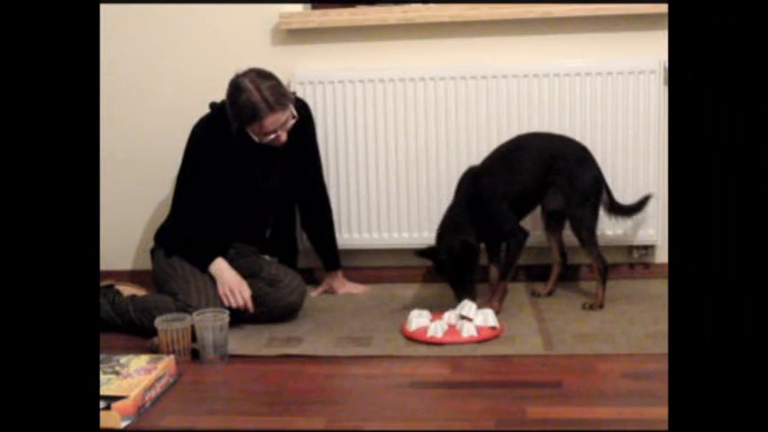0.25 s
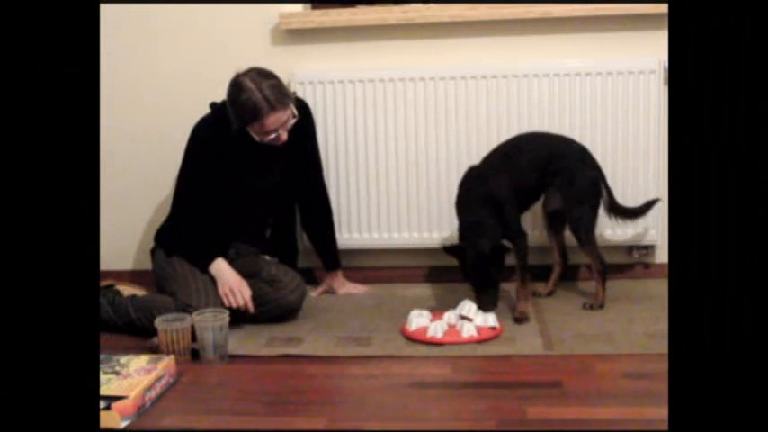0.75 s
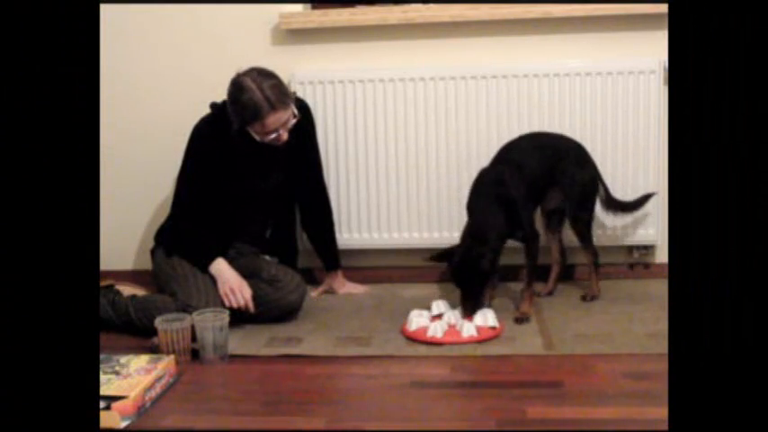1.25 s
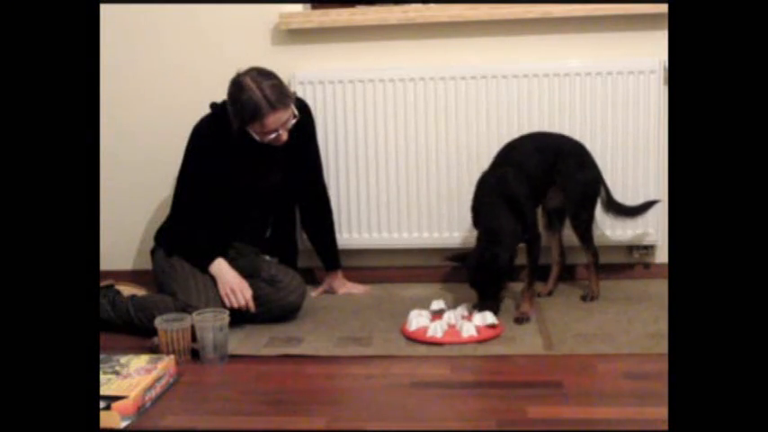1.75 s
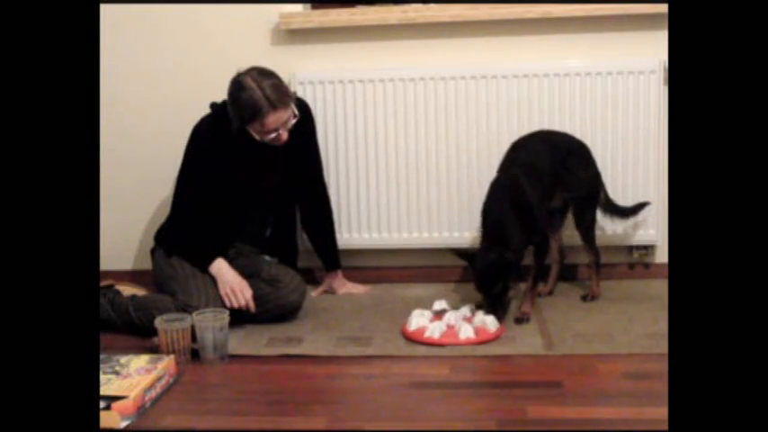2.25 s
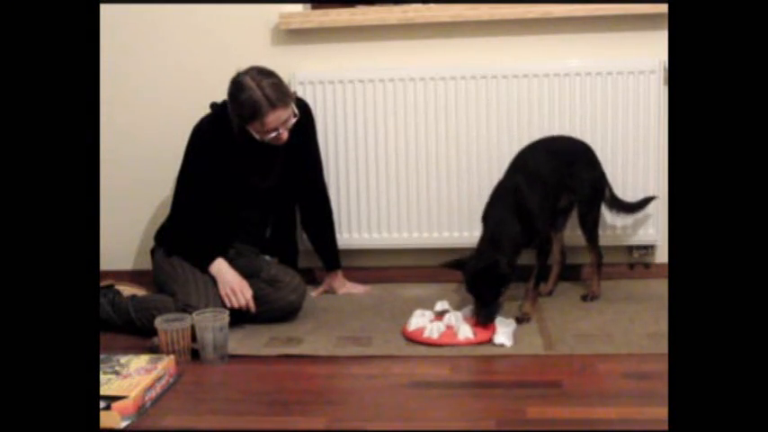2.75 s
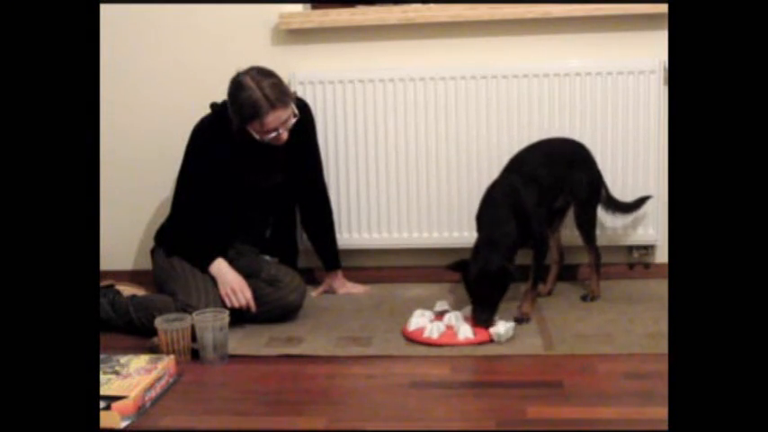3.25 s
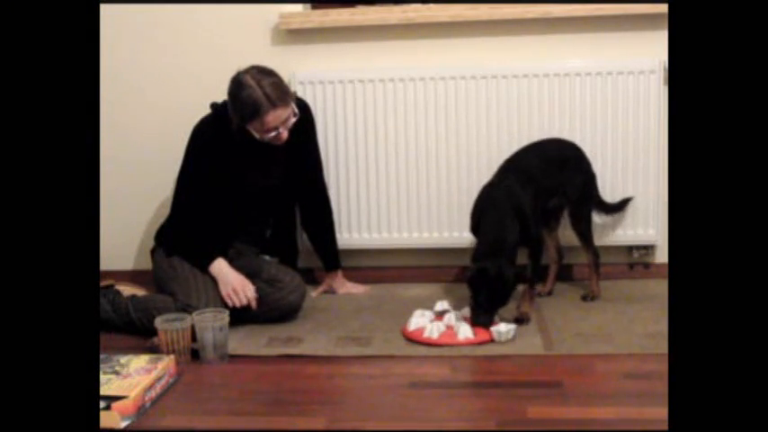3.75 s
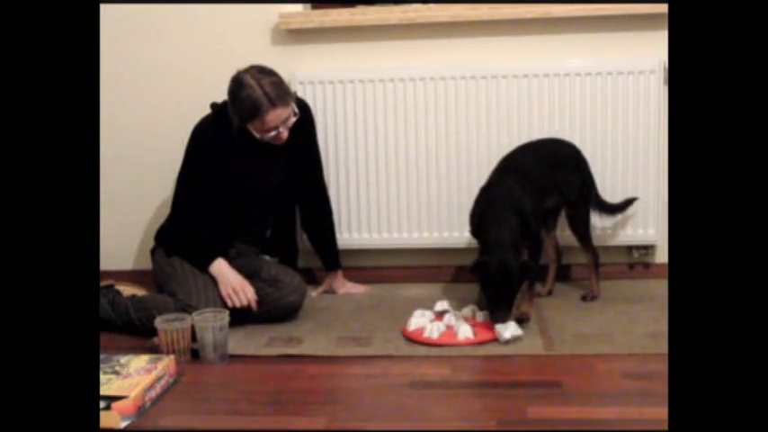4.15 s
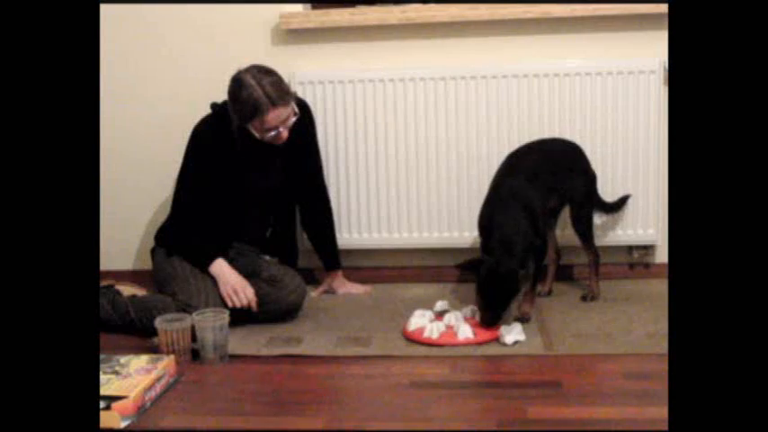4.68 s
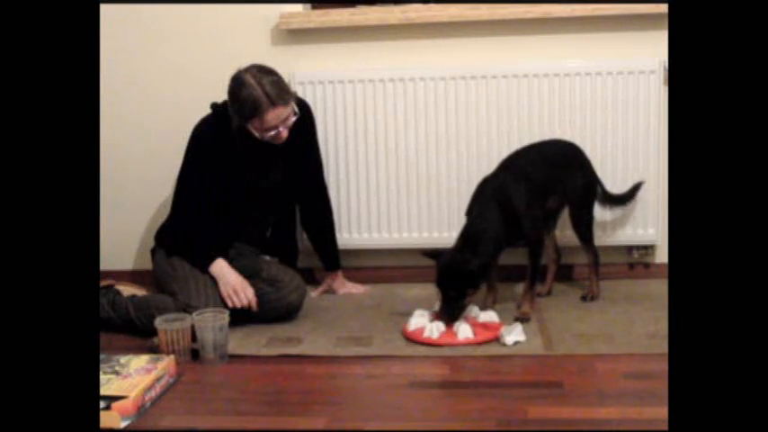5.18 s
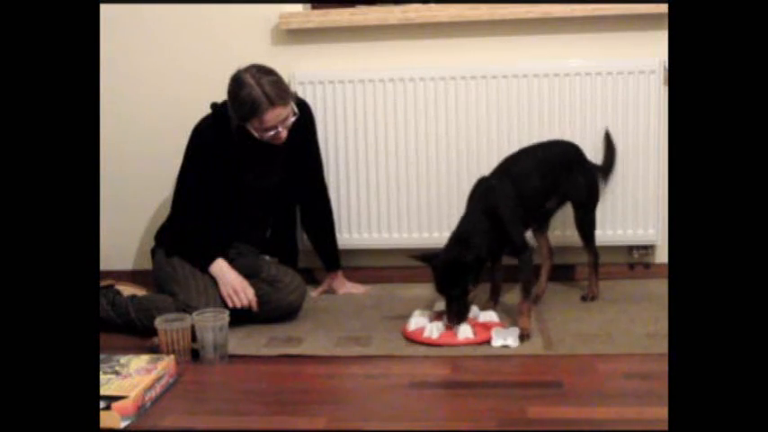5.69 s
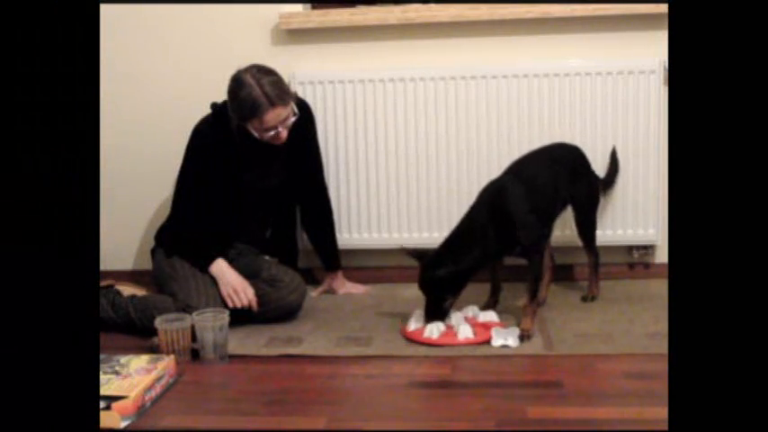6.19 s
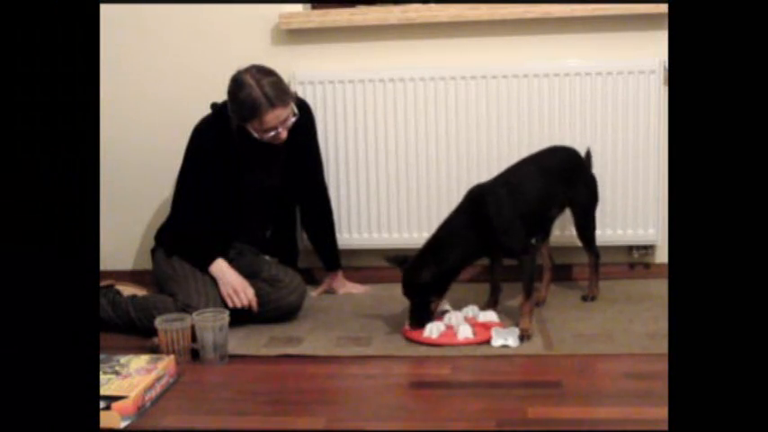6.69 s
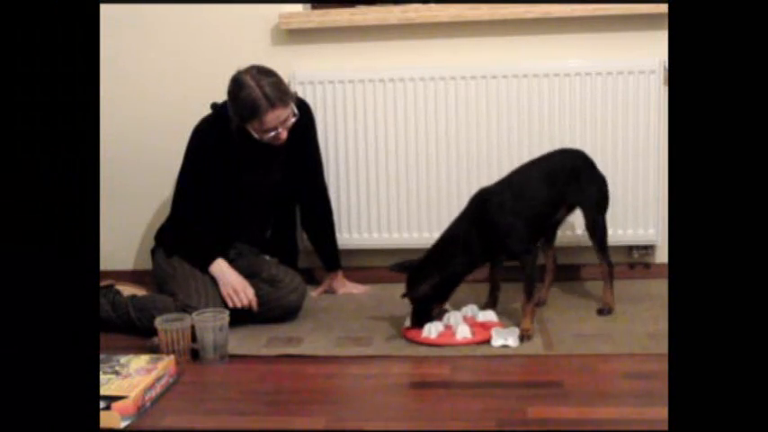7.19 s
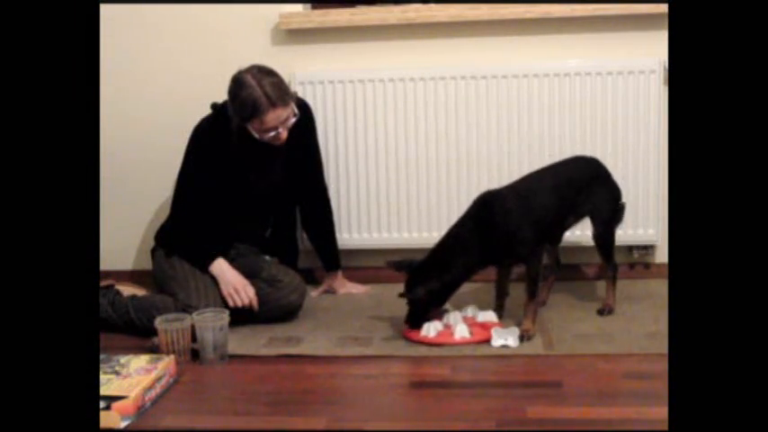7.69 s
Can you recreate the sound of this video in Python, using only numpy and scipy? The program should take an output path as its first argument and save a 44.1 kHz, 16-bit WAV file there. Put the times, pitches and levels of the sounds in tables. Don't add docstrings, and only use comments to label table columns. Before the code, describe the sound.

Short, dry plastic knocks and scraping rattles come in uneven bursts during the first three seconds, with rapid soft nose puffs between them. Afterwards mostly sniffing and faint lid taps remain, plus a small nasal snort, subdued paw thuds and one bright clack. Near the end come several firmer knocks and a longer breathy snort. Distant indoor pickup, short lively echo, constant low hiss.

```python
import sys
import numpy as np
from scipy import signal
from scipy.fft import rfft, irfft
from scipy.io import wavfile

SR = 44100
rng = np.random.default_rng(int(sys.argv[2]) if len(sys.argv) > 2 else 0)


def linear_from_db(decibels):
    return 10 ** (np.asarray(decibels, float) / 20)


def store_wav(level_fs):
    pcm = np.round(np.clip(np.atleast_2d(level_fs), -1, 1) * 32767)
    wavfile.write(sys.argv[1], SR, pcm.T.astype(np.int16))


N = 349706
T = np.arange(N) / SR

# f/Hz, level/dB per Hz
HISS_COLOUR = [(12, -36.5), (20, 2.5), (270, -1.5), (377, -3.5), (624, -5.5), (1260, -10.5), (1400, -8),
               (2600, -14.5), (3530, -14), (3950, -15.5), (16000, -27.5)]
# f/Hz, t60/s
ROOM_T60 = [(350, 0.38), (800, 0.4), (2000, 0.4), (5000, 0.38), (12000, 0.2)]
# delay t/s, level/dB
WALL_ECHOES = [(.0055, -12), (.0125, -14.5), (.0145, -23.5), (.022, -19), (.033, -17)]
# f/Hz, width f/Hz
PORT_NOTCH = (7880, 330)
# t/s, level/dB, f/Hz
PAW_THUDS = [
    (0.048, -48, 101),
    (0.057, -48.5, 183),
    (1.28, -51, 75.5),
    (3.092, -52, 91),
    (3.101, -49.5, 193),
    (3.26, -45, 266),
    (3.271, -37.5, 350),
    (2.739, -33.5, 350),
    (5.679, -48.5, 350),
    (7.659, -48.5, 74),
]
# f/Hz, width f/Hz, level/dB
NOSTRILS = [(2050, 740, 0), (3150, 910, -1.5), (1360, 960, -6), (6050, 2200, 2), (10500, 5000, -29)]
# first t/s, last t/s, first level/dB, last level/dB
SNIFF_RUNS = [(0.508, 0.666, -59, -58), (0.75, 0.76, -61, -62), (1.173, 1.18, -62.5, -60),
              (1.961, 2.102, -55.5, -58.5), (3.16, 3.855, -60, -62), (4.125, 4.13, -66, -64),
              (4.211, 4.281, -59.5, -59.5), (4.71, 4.867, -61.5, -56.5), (5.008, 5.114, -64.5, -60),
              (5.246, 5.25, -53, -50), (5.386, 5.948, -59, -57), (6.236, 6.793, -55, -57.5),
              (6.934, 7.238, -58, -56.5)]
# start t/s, peak t/s, end of blow t/s, hiss level/dB, nasal body over hiss level/dB
SNORTS = [
    (4.38, 4.52, 4.528, -57, 11),
    (7.654, 7.766, 7.91, -41.5, -4.5),
]
# f/Hz, level/dB, t60/s
LID_RING = [(1423, -2.5, 0.023), (1557, -3.5, 0.027), (1759, -2, .012), (2010, -2.5, 0.0079)]
# f/Hz, level/dB, t60/s
TRAY_BOOM = [(350, -17, 0.068), (481.7, -5, 0.081), (547, 1.5, 0.04), (628.7, 1.5, 0.056)]
# f/Hz, level/dB, t60/s
TRAY_WALL = [(782, -3, 0.02), (919, -3.5, 0.027), (1050, -1.5, 0.028), (1171, -2, 0.016)]
# f/Hz, level/dB, t60/s
RIM = [(2400, -15.5, 0.0036), (2870, -9, 0.0021), (3204, -15.5, 0.0039), (4500, -26.5, 0.0025)]
# f/Hz, level/dB, t60/s
TICK = [(6040, -4, 0.0013), (6980, -34.5, 0.0013), (8400, -21.5, 0.0032), (12200, -38, .0015)]
KNOCK_FAMILY_DB = [1, -2.5, 4.5, 13, 17.5]
RATTLE_FAMILY_DB = [-15.5, -18.5, -18.5, -8, -17]
# low f/Hz, high f/Hz, grit t60/s, level/dB
CRACKS = [(2120, 4290, 0.017, 2.0), (5200, 18000, 0.0047, -8)]
# t/s, lid level/dB, boom and wall over lid level/dB, hardness level/dB
SHOVES = [(0.0114, -24.5, -14, -27, 1), (0.0393, -18, -7, -8.5, -1.5), (0.0732, -9.5, -5, -7, 0),
          (0.1194, -26, 0, -26, 5), (0.1376, -13.5, -8.5, -10, 2), (0.2184, -22.5, -4, -0.5, -11),
          (0.3194, -29, -3, -0.5, -1.5), (1.0006, -23.5, -6.5, -1, 0.5), (1.2824, -40.5, 0.5, 3.5, 10),
          (1.3518, -37, -1, 3, 4), (1.3788, -29.5, -12, -9, -12), (1.3962, -12, -14, -15.5, -13),
          (1.4621, -20.5, -7, -24, -14), (1.4835, -16, -7, -6.5, -4.5), (1.5875, -23, 4, -5, -0.5),
          (1.6626, -12.5, -10.5, -9, -11), (1.7165, -22.5, -7, -13, -4), (1.7609, -27, -3.5, -2.5, -6.5),
          (1.8384, -44, 13, 9, 2)]
# t/s, lid level/dB, boom and wall over lid level/dB, hardness level/dB
DROPS = [(2.2153, -34.5, -23, 1, 3), (2.2312, -18, 0, -24, -1.5), (2.2354, -45, -5, -6, 10),
         (2.2411, -15.5, -10, 4.5, 13), (2.383, -19.5, -6, -4, 7.5), (2.5005, -24.5, -6, -6, 1),
         (2.6645, -34, 6, 6, 6.5), (2.7064, -27.5, 1, -3, 4.5), (2.7261, -13, -11, -3.5, 1),
         (2.8141, -26.5, -29, -4, 8.5), (2.9065, -27, -9.5, 0.5, 5.5), (3.2573, -17.5, -10.5, -4, -9.5),
         (3.3684, -40.5, 1, -3, -7), (7.3636, -17, -2, -5.5, -5), (7.6387, -24.5, -5, -3, 0.5),
         (7.781, -29, 1.5, 1, -4), (7.9079, -19, -6, -7, 6.5)]
# t/s, lid level/dB, boom and wall over lid level/dB, hardness level/dB
NUDGES = [(0.5774, -51.5, 7, 4, -1), (0.8724, -36.5, -6.5, -6, 4.5), (2.0264, -54.5, 15, 9, 16),
          (2.0792, -49.5, 3, 2.5, 2), (3.4875, -45, 2.5, 0, -16), (3.6684, -51.5, -2, 1, -11),
          (3.7958, -58.5, 7, -1, -7), (5.4345, -60, 10.5, 5.5, 24.5), (5.6715, -36.5, 0, -2, -5),
          (5.7954, -58.5, -1, 7, 17), (5.8944, -60.5, 17.5, 10, 1), (5.9085, -52, -9, 7.5, 13),
          (6.0744, -45, 1, -5, 7), (6.5924, -49, 1.5, 1, 13), (6.7114, -44, -5, 7, -15),
          (6.7704, -53.5, 4, 7, 1), (6.8134, -41.5, 2, -3, -6), (7.0628, -42, 2, 2.5, 6.5),
          (7.1631, -47, -6, 5, -3), (7.2404, -44.5, 3.5, 6.5, 7.5)]
# start t/s, end t/s, first level/dB, last level/dB
DRAGS = [
    (0.0, 0.064, -19, -24.5),
    (0.072, 0.328, -23.5, -36.5),
    (1.34, 1.665, -28.5, -26.5),
    (1.72, 1.897, -44, -30),
    (2.222, 2.242, -18, -12),
    (2.25, 2.356, -38, -54),
    (2.658, 2.73, -31, -24.5),
    (2.738, 3.0, -32, -35.5),
    (7.802, 7.893, -29, -40),
    (7.9, 7.908, -19, -22),
]
# t/s, peak level/dB
CLAW_CLACK = [
    (6.0002, -17),
]
# f/Hz, level/dB, t60/s
LOOSE_LID = [(1585, -7.5, 0.051), (1784, 1.5, 0.016), (2006, 3.5, 0.015), (2340, -5.5, 0.02),
             (4840, -11, 0.01)]


def rms_one(x):
    return x / np.sqrt(np.mean(x ** 2) + 1e-20)


def at_hz(points, hz):
    table = np.array(points)
    return np.interp(np.log(hz), np.log(table[:, 0]), table[:, 1])


def band_filter(x, low_hz, high_hz):
    return signal.sosfilt(signal.butter(2, [low_hz, high_hz], "band", fs=SR, output="sos"), x)


def spans_gain(spans):
    gain = 0
    for span in spans:
        times, levels_db = np.transpose(span)
        gain = gain + linear_from_db(np.interp(T, times, levels_db, left=-200, right=-200))
    return gain


def ring(clicks, hz, t60):
    shrink = linear_from_db(-60 / (t60 * SR))
    turn = 2 * np.pi * hz / SR
    return signal.lfilter([0, np.sin(turn)], [1, -2 * shrink * np.cos(turn), shrink ** 2], clicks + 1e-18)


def resonate(x, hz, width_hz):
    r = np.exp(-np.pi * width_hz / SR)
    top = np.array([1, 0, -1]) * (1 - r * r) / 2
    return signal.lfilter(top, [1, -2 * r * np.cos(2 * np.pi * hz / SR), r * r], x)


def add_at(out, start_s, wave):
    out[round(start_s * SR):][:len(wave)] += wave


def hiss():
    hz = np.maximum(np.arange(N // 2 + 1) * SR / N, 1)
    spectrum = rfft(rng.standard_normal(N)) * linear_from_db(at_hz(HISS_COLOUR, hz))
    return linear_from_db(-59.5) * rms_one(irfft(spectrum, N))


def room_echo():
    t = T[:SR * 3 // 4]
    echo = 0
    edges = 125 * 2 ** np.arange(0, 7.1, .5)
    for low, high in zip(edges, edges[1:]):
        band = band_filter(rng.standard_normal(len(t)), low, high)
        echo = echo + band * linear_from_db(-60 * t / at_hz(ROOM_T60, np.sqrt(low * high)))
    echo = echo * (1 - np.exp(-(t / 0.0026) ** 2))
    echo = echo / np.sqrt(np.sum(echo ** 2))
    for k, (delay_s, db) in enumerate(WALL_ECHOES):
        echo[round(delay_s * SR)] += linear_from_db(db) * (-1) ** k
    return echo


def room(x):
    direct_db, bass_db, echo_db = -6.5, -4.5, 0
    bass = signal.sosfilt(signal.butter(1, 1870, fs=SR, output="sos"), x)
    echoed = signal.fftconvolve(x, room_echo())[:N]
    return linear_from_db(direct_db) * x + linear_from_db(bass_db) * bass + linear_from_db(echo_db) * echoed


def paws():
    push = np.hanning(120) / 60
    out = 0
    for s, db, hz in PAW_THUDS:
        click = np.zeros(N)
        click[int(s * SR)] = 1
        out = out + linear_from_db(db) * ring(np.convolve(click, push)[:N], hz, 0.28)
    return out


def sniff_puffs():
    period_s, width_s = 0.14, 0.0089
    out = 0
    for first, last, first_db, last_db in SNIFF_RUNS:
        count = round((last - first) / period_s) + 1
        for s, db in zip(np.linspace(first, last, count), np.linspace(first_db, last_db, count)):
            out = out + linear_from_db(db) * np.exp(-.5 * ((T - s) / width_s) ** 2)
    return out


def snort_shape(start, peak, end, db):
    rise_db, sag_db_per_s, fade_db_per_s = 14, 20.5, 302
    held_db = db - sag_db_per_s * (end - peak)
    return [(start, db - rise_db), (peak, db), (end, held_db), (end + 0.095, held_db - 0.11 * fade_db_per_s)]


def nose():
    air = rng.standard_normal((2, N))
    voiced = [linear_from_db(db) * resonate(air[k % 2], hz, width_hz) for k, (hz, width_hz, db) in enumerate(NOSTRILS)]
    body = rms_one(sum(voiced[:3]))
    breath = rms_one(sum(voiced[3:]))
    flutter = linear_from_db(5.4 * rms_one(resonate(rng.standard_normal(N), 82, 78)))
    body_gain = spans_gain([snort_shape(*times, db + over_db) for *times, db, over_db in SNORTS])
    breath_gain = spans_gain([snort_shape(*times, db) for *times, db, over_db in SNORTS])
    snorts = flutter * (linear_from_db(-2.0) * body_gain * body + linear_from_db(-13.5) * breath_gain * breath)
    return sniff_puffs() * (body + linear_from_db(-15) * breath) + snorts


def strike(hz, t60, rise_s):
    t = T[:SR // 10]
    return np.sin(2 * np.pi * hz * t) * linear_from_db(-60 * t / t60) * (1 - np.exp(-t / rise_s))


def crack(noise, low_hz, high_hz, t60):
    burst = .12 * noise * linear_from_db(-60 * T[:len(noise)] / t60)
    burst[0] = 1
    burst = band_filter(burst, low_hz, min(high_hz, .45 * SR))
    return burst / np.max(np.abs(burst))


def knock_levels():
    s, lid, boom, wall, hard = np.transpose(sorted(SHOVES + DROPS + NUDGES))
    rim = -13 + 0.66 * hard
    tick = -22.5 + 1.16 * hard
    over_lid = np.transpose([0 * lid, boom, wall, rim, tick])
    return s, lid[:, None] + over_lid + KNOCK_FAMILY_DB


def rattle_touches():
    dragged = spans_gain([[(start, first_db), (end, last_db)] for start, end, first_db, last_db in DRAGS])
    touched = rng.random(N) < 150 / SR
    return touched * linear_from_db(4.22 * np.minimum(rng.exponential(1, N), 4)) * dragged


def claw_clack(out):
    for s, db in CLAW_CLACK:
        low_noise, high_noise = rng.standard_normal((2, 1024))
        add_at(out, s, linear_from_db(db - 2.0) * crack(low_noise, 2700, 5270, 0.014))
        add_at(out, s, -linear_from_db(db - 3.0) * crack(high_noise, 7500, 14400, 0.0053))
        for hz, level_db, t60 in LOOSE_LID:
            add_at(out, s, linear_from_db(db - 5.5 + level_db) * strike(hz, t60, 0.77 / hz))


def plastic():
    times, family_db = knock_levels()
    touches = rattle_touches()
    strength, shift = rng.standard_normal((2, len(times), 20))
    out = np.zeros(N + SR)
    for k, family in enumerate([LID_RING, TRAY_BOOM, TRAY_WALL, RIM, TICK]):
        for j, (hz, level_db, t60) in enumerate(family):
            mode = 4 * k + j
            rattle = touches * rng.standard_normal(N) * linear_from_db(RATTLE_FAMILY_DB[k] + level_db)
            out[:N] += ring(rattle, hz, t60)
            for i, s in enumerate(times):
                gain = linear_from_db(family_db[i, k] + level_db + 3.43 * strength[i, mode]) * (-1) ** j
                add_at(out, s, gain * strike(hz * (1 + 0.037 * shift[i, mode]), t60, 0.49 / hz))
    for k, (low_hz, high_hz, t60, level_db) in enumerate(CRACKS):
        for i, s in enumerate(times):
            wave = crack(rng.standard_normal(1024), low_hz, high_hz, t60)
            add_at(out, s, linear_from_db(family_db[i, 3 + k] + level_db) * wave * (-1) ** k)
    claw_clack(out)
    return signal.sosfilt(signal.butter(4, 320, "high", fs=SR, output="sos"), out[:N])


def scene():
    return (room(plastic() + nose()) + paws() + hiss())[None]


def top_cut(x):
    return signal.sosfilt(signal.butter(12, 16500, fs=SR, output="sos"), x)


def record(dry):
    hz, width_hz = PORT_NOTCH
    notched = dry - .85 * resonate(dry, hz, width_hz)
    mix = signal.sosfilt(signal.cheby2(12, 45, 16000, fs=SR, output="sos"), notched)
    return top_cut(mix)


dry = scene()
out = record(dry)
store_wav(out)
```